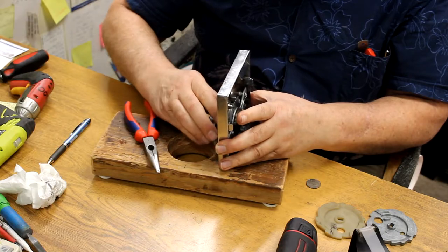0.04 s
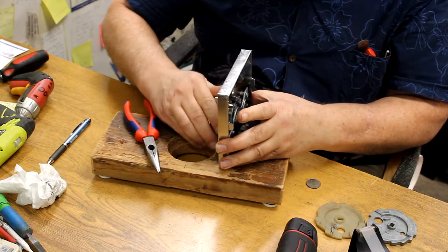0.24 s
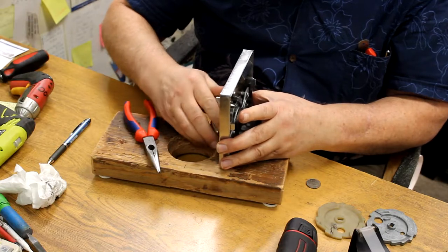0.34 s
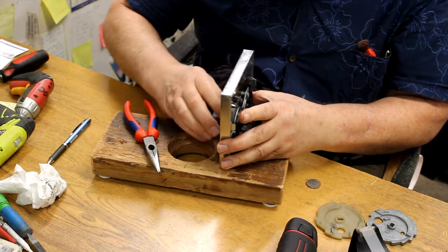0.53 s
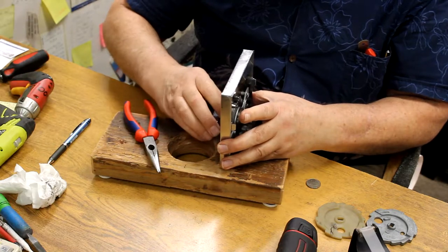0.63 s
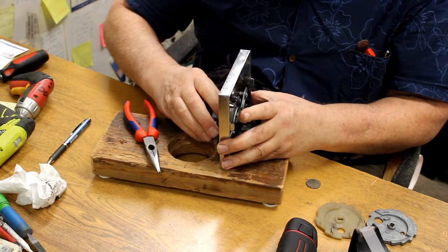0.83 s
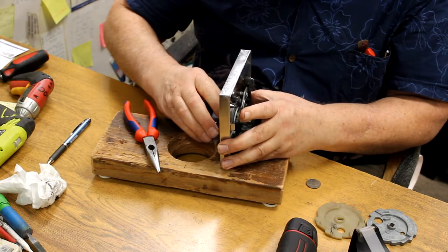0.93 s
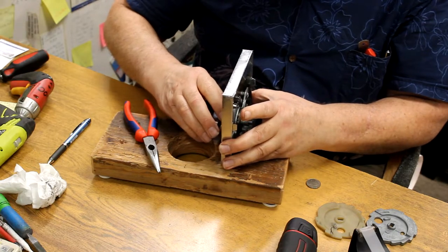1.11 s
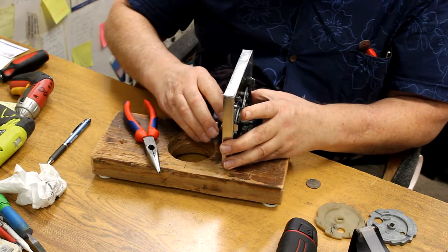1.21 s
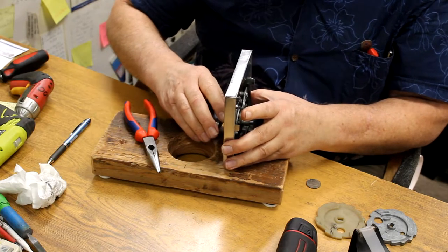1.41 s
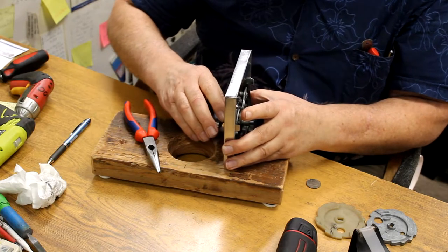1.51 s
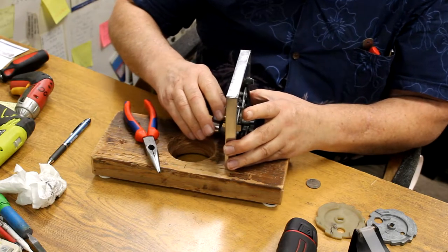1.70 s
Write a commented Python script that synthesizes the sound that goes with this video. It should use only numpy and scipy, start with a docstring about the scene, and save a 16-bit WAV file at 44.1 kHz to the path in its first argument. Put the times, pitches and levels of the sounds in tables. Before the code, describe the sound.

A small metal mechanism clicks as it is turned by hand on a wooden block. Quick ticks start at about 0.1 seconds, with faint finger rubbing, and end in a sharp snap near 0.3. Two duller clacks knock the wood between 0.5 and 0.6. Soft bumps follow from around 1 second, with one last light tick at 1.2. Low hiss and electrical hum fill the small room throughout.

```python
"""A small metal mechanism is turned by hand on a wooden block at a workbench.
Fingers rub and bump the case as the catch ticks and snaps over.
It drops back with two duller clacks that knock the wood; soft bumps and one last tick follow.
Throughout, a small room answers the clicks over low hiss and mains hum."""
import sys
import numpy as np
from scipy import signal
from scipy.fft import rfft, irfft
from scipy.io import wavfile
from scipy.ndimage import uniform_filter1d

SR = 44100
rng = np.random.default_rng(int(sys.argv[2]) if len(sys.argv) > 2 else 0)


def to_wav(s):
    """Save 16-bit WAV."""
    ch = np.atleast_2d(s).T  # columns
    pcm = np.round(np.clip(ch, -1, 1) * 32767)  # PCM
    wavfile.write(sys.argv[1], SR, pcm.astype(np.int16))


N = 77175


def mechanism():
    """The catch ticks, snaps and drops back: one click per contact."""
    # start_s, rise_s, crack_t60_s, part_hz, part_db, then tone_db at each of click's tone_hz
    contacts = [ (.1380, .001, 0.038, 2200, 1, 8.5, 9, -7, -30, -21, -33, -26),
                (0.16, 0.0005, 0.045, 3540, -6.5, 7, -9, -9, -13.5, -11.5, -17, -23),
                (0.2352, 0.0002, 0.0072, 4210, -5.5, -15, -14, 3.5, -7, 9.5, 10, 0.5),
                (0.24, 0.0018, .02, 4330, -0.5, -9, -14, -4, -5, -4, 0, -3),
                (0.2493, 0.00065, 0.014, 9910, -7.5, 8, -5, 3, 1, 1.5, 13.5, 12),
                (0.2666, .0004, 0.0066, 8940, -5.5, -24, 0, 8, -13, -3, 6, 6.5),
                (0.278, 0.0016, 0.011, 2427, -6.5, 8.5, 16, 7.5, 18.5, 18.5, 19.5, 12.5),
                (.4490, 0.00069, 0.017, 4730, -13, -29, 2.5, -6, -15.5, -13.5, -34, -29),
                (.4956, 0.00037, 0.095, 7430, -21, -11, 8.5, -14.5, -2.5, 7.5, 1.5, 4.5),
                (0.5191, 0.0073, 0.016, 2707, -16, 18, 16, 2, 13.5, 10, 8.5, 10.5),
                (0.5692, 0.00049, 0.05, 8400, -14, 21, -1.5, 11, 2, 0, -4, 0.5),
                (0.5811, 0.0023, 0.0062, 6700, -16, 12, 13.5, 16.5, 6.5, 11.5, 12, 15.5),
                (1.238, 0.0029, 0.06, 1870, 2, -28, -20, -11.5, -25.5, -26, -40, -35)]
    out = np.zeros(N)
    for start_s, rise_s, crack_t60_s, part_hz, part_db, *tone_db in contacts:
        add(out, start_s, click(rise_s, crack_t60_s, part_hz, part_db, tone_db))
    return out


def click(rise_s, crack_t60_s, part_hz, part_db, tone_db, size=16384):
    """One contact: a crack of dense, fast-damped modes; the struck part, steel and wood ring."""
    # steel modes: pitch_hz, gain_db
    steel_modes = [(2191, -5), (2324, -9), (2453, 0), (2654, -1), (2805, -7), (3128, -7.5), (3435, -10),
                   (4313, -6), (4445, -6), (4753, -7), (4876, -7), (6048, -7), (6396, -6), (6735, -7),
                   (7308, -7)]
    # block and bench modes: pitch_hz, gain_db
    wood_modes = [(122, 2), (175, -6), (270, -10), (342, -3), (424, -1), (539, 1), (588, 0), (722, -2),
                  (886, -4), (1240, -5), (1300, -4), (1400, -9)]
    # points of each contact's tone curve: freq_hz
    tone_hz = [130, 450, 1300, 2500, 4500, 6600, 9000]
    # colour common to all clicks: freq_hz, gain_db
    shared_colour = [(30, -33), (75, -16), (120, 0), (220, -0.5), (380, 2.5), (680, 3), (950, -6),
                     (1330, 2), (1800, -8), (2200, 0), (2550, -1.5), (2950, -1), (3250, 2), (3850, -5),
                     (4400, -2), (4900, -1), (5500, -3), (6400, -2.5), (8000, 0.5), (10100, -8.5),
                     (12500, -20.5), (15500, -47)]
    t = np.arange(size) / SR
    onset = np.minimum(t / max(rise_s, 1e-4), 1)
    knock_hz, knock_db, knock_t60_s = 935, -2, 0.06
    low_noise = signal.sosfilt(signal.butter(4, knock_hz, fs=SR, output="sos"), rng.standard_normal(size))
    knock = low_noise * amp(knock_db - 60 * t / knock_t60_s)
    snap = rng.choice([-1, 1], size) * amp(-60 * t / crack_t60_s)
    crack = onset * (snap + knock)
    smooth_power = uniform_filter1d(abs(rfft(crack)) ** 2, size=110)
    body = tint(crack, smooth_power ** -0.5)  # flattens the crack's spectrum
    # pitch_hz, gain_db, t60_s; higher modes die sooner
    modes = [(part_hz, part_db, 0.011)]
    modes += [(hz, db - 14.5, 0.1 * (1000 / hz) ** 0.67) for hz, db in steel_modes]
    modes += [(hz, db - 24, 0.14 * (1000 / hz) ** 0.13) for hz, db in wood_modes]
    for pitch_hz, gain_db, t60_s in modes:
        ring = onset * amp(-60 * t / t60_s) * np.sin(2 * np.pi * pitch_hz * t)
        body += amp(gain_db) * ring / np.linalg.norm(ring)
    bin_hz = np.fft.rfftfreq(size, 1 / SR)
    colour_db = read(list(zip(tone_hz, tone_db)), bin_hz) + read(shared_colour, bin_hz)
    return tint(body, amp(colour_db))


def hands():
    """Parts slide under the fingers with a low rub and grainy scrape; hands bump the bench."""
    # sliding parts: centre_s, length_s, rub_db, scrape_db
    slide_events = [(0.106, 0.13, -42.5, -77), (0.222, 0.065, -46.5, -49), (0.268, 0.089, -48, -34.5),
                    (0.496, 0.1, -41.5, -46)]
    # soft bumps: centre_s, length_s, pitch_hz, level_db
    bump_events = [(0.116, 0.068, 86, -37.5), (0.173, 0.11, 54.5, -50), (0.923, 0.3, 66, -48.5),
                   (1.084, 0.059, 89.7, -35), (1.209, 0.091, 72, -39), (1.566, 0.088, 90.5, -37.5)]
    # low rub: freq_hz, gain_db
    rub_spectrum = [(60, -13), (250, 5.5), (500, 0), (750, -2.5), (1100, -20), (4000, -57)]
    # metal scrape: freq_hz, gain_db
    scrape_spectrum = [(300, -18), (1500, 5), (4500, 12), (8500, 0.5), (11000, -11), (15000, -38)]
    t = np.arange(N) / SR
    rub = noise(rub_spectrum)
    smooth_scrape = noise(scrape_spectrum)
    grain_db = evened(uniform_filter1d(rng.standard_normal(N), size=90))
    scrape = evened(smooth_scrape * amp(grain_db))
    out = np.zeros(N)
    for centre_s, length_s, rub_db, scrape_db in slide_events:
        out += swell(centre_s, length_s) * (amp(rub_db) * rub + amp(scrape_db) * scrape)
    for centre_s, length_s, pitch_hz, level_db in bump_events:
        tone = np.sqrt(2) * np.sin(2 * np.pi * (pitch_hz * t + rng.random()))
        out += amp(level_db) * swell(centre_s, length_s) * tone
    return out


def room(x, delay_s=0.004, gain_db=-7.5, size=22050):
    """Short diffuse tail; treble dies first."""
    # room decay: freq_hz, t60_s
    decay_times = [(100, 0.52), (260, 0.2), (700, 0.15), (1840, 0.18), (4850, 0.15), (9000, 0.14),
                   (14000, 0.11)]
    hz, t, spectra = signal.stft(rng.standard_normal(size), SR, nperseg=256)
    decay = amp(-60 * t / read(decay_times, hz)[:, None])
    _, tail = signal.istft(spectra * decay, SR)
    out = np.zeros(N)
    add(out, delay_s, signal.fftconvolve(x, tail / np.linalg.norm(tail)))
    return amp(gain_db) * out


def background(hiss_db=-46, waver_rad=0.12):
    """Steady hiss and slightly wavering mains hum."""
    # hiss: freq_hz, gain_db
    hiss_spectrum = [(20, -3.5), (75, 0.5), (125, -6.5), (180, -10), (265, -10.5), (370, -15.5),
                     (520, -19.5), (700, -20), (1200, -20.5), (2000, -23), (4000, -29), (8500, -37.5),
                     (12000, -45.5), (15500, -53)]
    # hum: pitch_hz, level_db
    hum_tones = [(120, -54.5), (241, -55.5), (467, -62), (527, -62)]
    t = np.arange(N) / SR
    out = amp(hiss_db) * noise(hiss_spectrum)
    for pitch_hz, level_db in hum_tones:
        drift_rad = waver_rad * evened(uniform_filter1d(rng.standard_normal(N), size=8000))
        phase_rad = 2 * np.pi * (pitch_hz * t + rng.random()) + drift_rad
        out += amp(level_db) * np.sqrt(2) * np.sin(phase_rad)
    return out


def amp(db):
    """Decibels to gain."""
    return 10 ** (np.asarray(db) / 20)


def evened(x):
    """Scales to unit rms."""
    return x / np.sqrt(np.mean(x ** 2) + 1e-20)


def read(points, hz):
    """Interpolates a table on a log-frequency axis."""
    point_hz, values = np.transpose(points)
    return np.interp(np.log(hz + 1), np.log(point_hz), values)


def add(mix, start_s, sound):
    """Mixes a sound in at start_s."""
    part = mix[max(round(start_s * SR), 0):][:len(sound)]
    part += sound[:len(part)]


def noise(spectrum):
    """Unit-rms noise with the given spectrum."""
    gain = amp(read(spectrum, np.fft.rfftfreq(N, 1 / SR)))
    return evened(irfft(rfft(rng.standard_normal(N)) * gain, N))


def tint(x, gain):
    """Minimum-phase filter with the given gain per bin."""
    log_gain = np.log(np.r_[gain, gain[-2:0:-1]] + 1e-9)
    response = np.exp(np.conj(signal.hilbert(log_gain)))[:len(gain)]
    return irfft(rfft(x) * response)


def swell(centre_s, length_s):
    """Gaussian rise and fall."""
    return np.exp(-2 * ((np.arange(N) / SR - centre_s) / (length_s / 2)) ** 2)


def scene():
    """Mechanism in its room, with hands and background; mono."""
    clicks = mechanism()
    return (clicks + room(clicks) + hands() + background())[None]


def record(dry, ceiling=1.1, edge_hz=15600):
    """Soft ceiling rounds the loudest snap; a low-pass follows."""
    limited = dry / (1 + (dry / ceiling) ** 4) ** 0.25
    lowpass_taps = signal.firwin(255, edge_hz, window=("kaiser", 8), fs=SR)
    return signal.oaconvolve(limited, lowpass_taps[None], "same")


dry = scene()
out = record(dry)
to_wav(out)
```